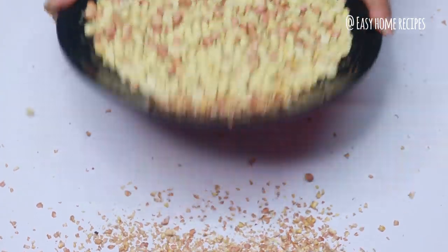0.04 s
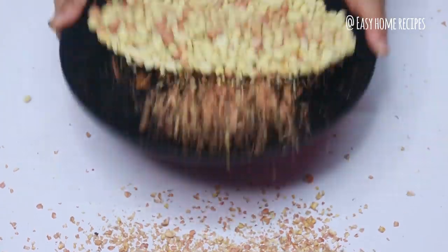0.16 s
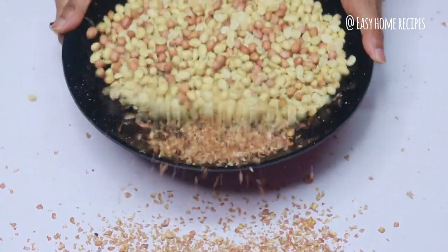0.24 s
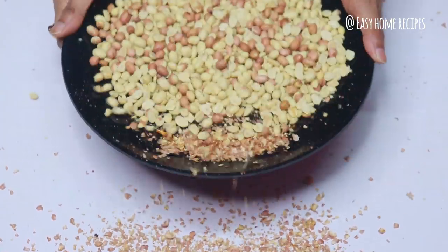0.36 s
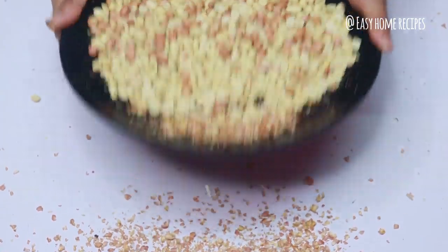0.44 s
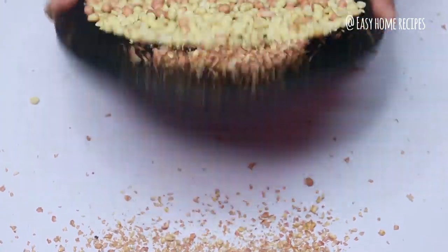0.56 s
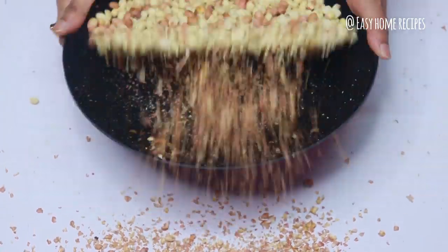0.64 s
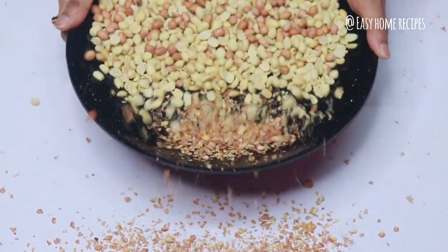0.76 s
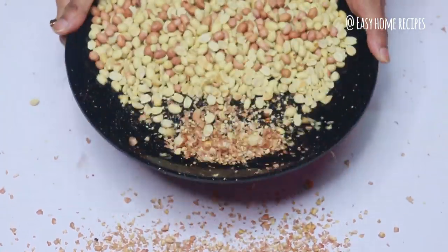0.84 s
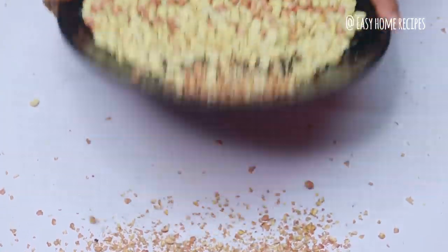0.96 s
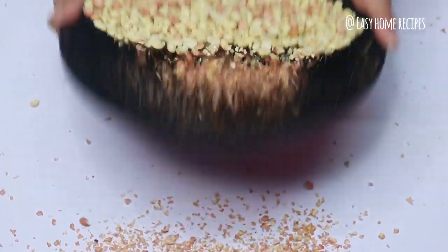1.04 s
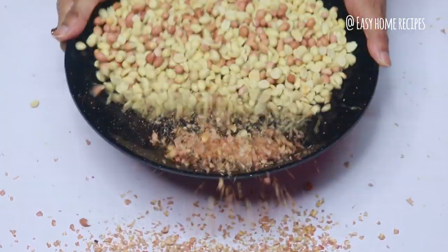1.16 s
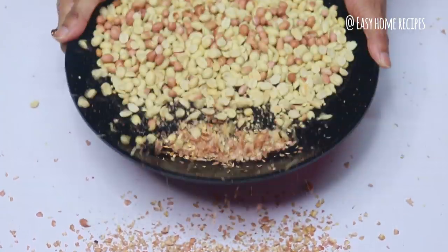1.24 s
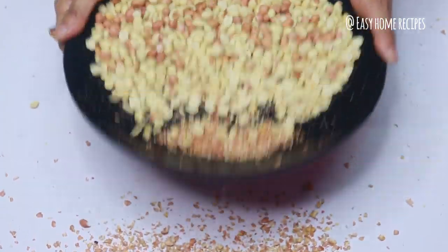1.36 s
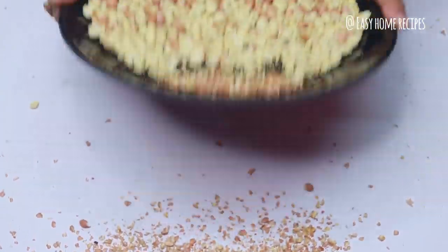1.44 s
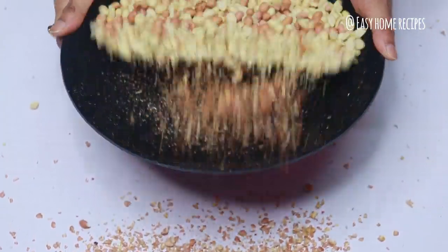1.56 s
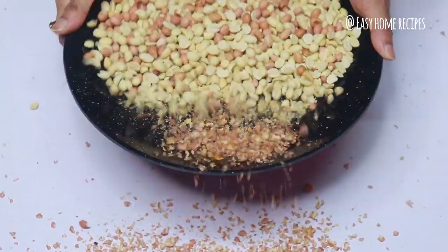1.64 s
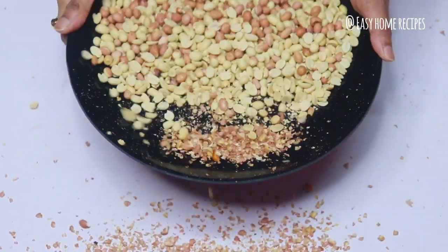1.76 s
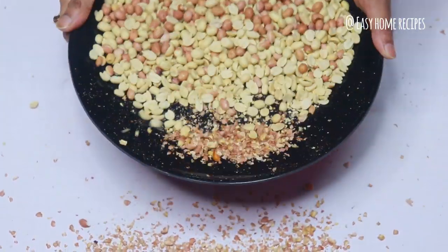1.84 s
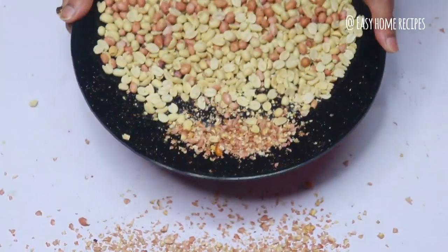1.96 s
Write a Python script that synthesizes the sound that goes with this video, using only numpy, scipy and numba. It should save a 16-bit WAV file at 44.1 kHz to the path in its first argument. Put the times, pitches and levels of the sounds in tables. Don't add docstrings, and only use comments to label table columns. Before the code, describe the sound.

Roasted peanuts rattle on a thin plate, close up in a quiet kitchen. The tail of one toss fades at the start, then dense, hard clattering bursts land at about 0.2, 0.65, 1.1 and 1.6 seconds, the first loudest and slightly distorted. Each mixes a dull thud, short plate ring, crisp clacks and skin ticks, dying quickly into stray clicks, brief room ring and faint low table rumble.

```python
import sys
import numpy as np
from scipy import signal
from scipy.fft import rfft, irfft
from scipy.io import wavfile
from scipy.ndimage import uniform_filter1d
from numba import njit

SR = 44100
rng = np.random.default_rng(int(sys.argv[2]) if len(sys.argv) > 2 else 0)


def ratio_of_db(decibels):
    return 10 ** (np.asarray(decibels, float) / 20)


def unload_wav(signal):
    wavfile.write(
        sys.argv[1],
        SR,
        np.round(np.clip(np.atleast_2d(signal).T, -1, 1) * 32767).astype(np.int16),
    )


N = 88200
LEAD_S = 0.4
BIGGEST = 0.01

# low and high edge in Hz, delay of the
# fall's end in s, settling factor, ring in cycles, size scatter in dB, level in dB.
CONTACTS = [(375.4, 1698, -0.016, 1.04, 6.85, 3, 5), (1301.6, 4800, 0.0066, 0.91, 8.5, -1, -2.5),
            (4570, 10000, 0.0032, 1.16, 18, 2.5, -1), (10000, 15500, 0.0099, 1.56, 2.8, 11, 4)]


def band(x, lo_hz, hi_hz):
    return signal.sosfilt(
        signal.butter(2, [lo_hz, min(hi_hz, 0.45 * SR)], "band", fs=SR, output="sos"), x)


def unit(x):
    return x / np.sqrt(np.mean(x ** 2))


def colour_db(spectrum, hz):
    table_hz, table_db = np.array(spectrum).T
    return np.interp(np.log(hz), np.log(table_hz), table_db)


def sizes(rank, scatter_db):
    return unit(ratio_of_db(-scatter_db * np.log(np.maximum(rank, BIGGEST))))


def fall(t, shift, settle, low=0, high=0, ring=0):
    # first landing in s, build-up in s, full fall in s, level in dB, settling in dB per s.
    tosses = [
        (-.26, 0.032, 0.058, -17.5, 93),
        (0.201, 0.046, 0.051, -3.5, 230),
        (0.626, 0.066, 0.058, -6, 209),
        (1.092, 0.063, 0.039, -6.5, 162.5),
        (1.563, 0.054, 0.054, -7, 188),
    ]
    # thud level in dB, thud settling factor,
    # thud lead in s, brightness in dB, low ring in dB.
    thuds = [
        (-0.5, 1.02, .01, 4, -1),
        (-1.5, 1.14, 0.017, -1.5, 0.5),
        (-1, 0.86, 0.0059, 0., 1.5),
        (0.5, 1.2, 0.011, 0.5, 1),
        (-2.5, 0.97, 0.017, 0., 3.5),
    ]
    first_db, rise_bend, middle_lead = -43, 0.54, 0.82
    lead_share = 1 if low else 0 if high else middle_lead
    out = 0
    for (start, rise, hold, db, slope), (thud_db, factor, lead, bright_db, ring_db) in zip(tosses, thuds):
        early = lead * lead_share
        first = start - early
        up = np.clip((t - first) / (rise + early + max(shift, -0.03) / 2), 0, 1) ** rise_bend
        settling_s = np.clip(t - start - rise - hold - shift, 0, None)
        down = slope * settle * factor ** low * settling_s
        level_db = db + low * thud_db + high * bright_db + ring * ring_db
        out = out + (t > first) * ratio_of_db(level_db + first_db * (1 - up) - down)
    return out


@njit
def grains(at, hz, decay, size, phase, n, sr):
    out = np.zeros(n)
    for j in range(len(at)):
        p = np.exp(2j * np.pi * hz[j] / sr - decay[j])
        z = size[j] * np.exp(1j * phase[j])
        for i in range(at[j], min(n, at[j] + int(6 / decay[j]))):
            out[i] += z.imag
            z *= p
    return out


def clacks(n):
    # frequency in Hz, density in dB per Hz.
    clack_colour = [(180, -55), (300, -28.5), (707, -4.5), (834, -9.5), (1720, -4), (2000, -7),
                    (2690, -3.5), (8540, -13.5), (15500, -25.5)]
    top_steeper = 1.85
    place, rank = rng.random((7000, 2)).T
    at = (place * n).astype(np.int64)
    out = 0
    for lo_hz, hi_hz, shift, settle, cycles, scatter_db, db in CONTACTS:
        pitch, turn = rng.random((len(at), 2)).T
        hz = lo_hz * (hi_hz / lo_hz) ** pitch
        decay = hz / SR / cycles
        evenness = np.sqrt(hz * decay * np.log(hi_hz / lo_hz))
        size = sizes(rank, scatter_db) * ratio_of_db(db + colour_db(clack_colour, hz)) * evenness
        rain = fall(place * n / SR - LEAD_S, shift, settle, low=int(lo_hz < 1000), high=int(lo_hz > 3000))
        if lo_hz > 8000:
            rain = rain ** top_steeper
        out = out + grains(at, hz, decay, size * rain, 2 * np.pi * turn, n, 1. * SR)
    return out


def plate(n):
    # mode frequency in Hz, level in dB, t60 in s.
    modes = [(453, -17, 0.068), (510.3, -8, 0.04), (729, -5, 0.1), (792.4, -4.5, 0.045), (1208, -5, 0.03),
             (1357, -2, 0.02), (1682, -13, 0.034), (1788, -0.6, 0.042), (2693, -0.5, 0.038),
             (2908, -2.5, 0.03), (3565, -3.5, 0.051), (6102, -5.5, 0.017), (7195, -1.5, 0.014),
             (8314, -1.5, 0.016)]
    scatter_db = 3
    high_mode_settle = 1.57
    place, rank = rng.random((5000, 2)).T
    at = (place * n).astype(np.int64)
    big = sizes(rank, scatter_db)
    tops_hz = [contact[1] for contact in CONTACTS]
    out = 0
    for hz, db, t60 in modes:
        k = int(np.clip(np.searchsorted(tops_hz, hz), 0, len(CONTACTS) - 1))
        shift, settle = CONTACTS[k][2:4]
        high = int(k > 1)
        rain = fall(at / SR - LEAD_S, shift, settle * high_mode_settle ** high,
                    low=int(k == 0), high=high, ring=int(hz < 900))
        hits = np.zeros(n)
        np.add.at(hits, at, big * rng.uniform(-1.02, 1, len(at)) * rain)
        decay = np.log(1000) / (max(t60, 0.01) * SR)
        r, w = np.exp(-decay), 2 * np.pi * hz / SR
        ringing = signal.lfilter([1], [1, -2 * r * np.cos(w), r * r], hits)
        out = out + ratio_of_db(db) * np.sqrt(decay) * np.sin(w) * ringing
    return out


def tick(t60):
    t = np.arange(int(t60 * SR)) / SR
    return rng.standard_normal(len(t)) * ratio_of_db(-60 * t / t60)


def bounces(n):
    level_db, scatter_db, settle, t60, centre_hz = -2, 1, 0.67, 0.012, 3240
    place, rank = rng.random((330, 2)).T
    strength = sizes(np.maximum(rank, 8 * BIGGEST), scatter_db) * fall(place * n / SR - LEAD_S, 0., settle)
    hits = np.zeros((4, n))
    np.add.at(hits, (np.arange(len(place)) % 4, (place * n).astype(np.int64)), strength)
    out = sum(signal.fftconvolve(h, tick(t60))[:n] for h in hits)
    out = band(out, centre_hz / 4, centre_hz * 3)
    return ratio_of_db(level_db) * band(out, centre_hz / 8, centre_hz * 3)


def strays(n):
    # time in s, peak in dB, low and high edge in Hz.
    lone_nuts = [(0.012, -40, 2470, 9000), (.0303, -28, 6140, 15500), (.0972, -37, 800, 11000),
                 (0.1494, -43, 800, 11900), (.2089, -15.5, 1550, 10000), (0.6307, -23, 900, 9900),
                 (.6386, -25, 900, 9000), (0.66, -25, 910, 10000), (.6734, -25, 900, 12960),
                 (0.688, -1, 900, 11000), (0.884, -37, 6050, 15500), (1.0934, -49, 890, 10000),
                 (1.1159, -20, 893, 10000), (1.1423, -16, 895, 11000), (1.3218, -28.5, 5000, 15000),
                 (1.376, -22.5, 600, 9500), (1.397, -25, 1500, 9000), (1.557, -33, 500, 2500),
                 (.1945, -30, 400, 2000), (1.389, -34, 7100, 15400), (1.422, -26, 1000, 11700),
                 (1.4345, -56, 11000, 15500), (1.4701, -38, 10000, 15700), (1.523, -48, 11000, 15630),
                 (1.5748, -25, 906, 10000), (1.5924, -11, 900, 11000), (1.745, -33, 9000, 15500),
                 (1.566, -24, 2490, 10000), (1.25, -16, 5000, 11000), (1.85, -32, 6060, 10500)]
    out = np.zeros(n + 2000)
    for s, db, lo_hz, hi_hz in lone_nuts:
        crack = band(band(tick(0.011), lo_hz, hi_hz), lo_hz, hi_hz)
        at = int((s + LEAD_S) * SR)
        out[at:at + len(crack)] += ratio_of_db(db) * crack / np.max(np.abs(crack))
    return out[:n]


def room(x):
    # low and high edge in Hz, t60 in s, level in dB.
    tail_bands = [(106, 1300, 0.48, -9.5), (1270, 7000, 0.48, -12.5), (5000, 9000, 0.37, -12),
                  (9000, 48000, 0.083, -5)]
    t = np.arange(int(SR * LEAD_S * 2)) / SR
    tail = 0
    for lo_hz, hi_hz, t60, db in tail_bands:
        part = rng.standard_normal(len(t)) * ratio_of_db(-60 * t / t60) * np.clip(t / 0.0027, 0, 1)
        tail = tail + ratio_of_db(db) * band(part / np.sqrt(np.sum(part ** 2)), lo_hz, hi_hz)
    return x + signal.fftconvolve(x, tail)[:len(x)]


def table(t):
    # time in s, level in dB, pitch in Hz.
    rumble = [(0., -47, 57.3), (.15, -66, 49.8), (.26, -40.5, 50.1), (0.344, -60, 63.4), (.375, -38, 62),
              (.42, -40, 46.4), (.48, -43.5, 46), (.64, -58, 48), (.73, -53.5, 56.5), (1.0, -56, 56.2),
              (1.24, -55, 60.8), (1.55, -53.5, 59.4), (1.68, -63, 60.8), (1.73, -45, 59.9),
              (1.82, -33, 61.5), (1.865, -45, 57), (1.94, -32, 56.2), (2., -38, 54.7)]
    # start in s, level in dB, pitch in Hz, length in s.
    knocks = [
        (0.61, -56, 270, 0.06),
        (1.81, -40.5, 264.5, 0.074),
        (1.87, -46, 165, 0.058),
        (1.96, -44, 200, 0.041),
        (.365, -44, 260, 0.032),
        (0.6, -57, 150, 0.12),
        (0.49, -48, 430, 0.15),
    ]
    noise_db, steady_db = -10.5, -59
    s, db, hz = np.array(rumble).T
    hum = np.sqrt(2) * np.sin(2 * np.pi * np.cumsum(np.interp(t, s, hz)) / SR)
    noise = unit(band(rng.standard_normal(N), 27.8, 82))
    swell = ratio_of_db(uniform_filter1d(np.interp(t, s, db), size=900))
    out = (hum + ratio_of_db(noise_db) * noise) * swell
    out = out + ratio_of_db(steady_db) * noise[::-1]
    for s, db, hz, length in knocks:
        knock = unit(band(rng.standard_normal(N), hz * 0.9, hz * 1.1))
        out = out + ratio_of_db(db) * knock * np.sin(np.pi * np.clip((t - s) / length, 0, 1)) ** 2
    return out


def floor():
    # frequency in Hz, density in dB per Hz.
    air_colour = [(53, -27), (90, -3), (148, -2), (561, -7.5), (1450, -8), (3210, -15), (3500, -13),
                  (4430, -24), (15500, -26)]
    hz = np.maximum(np.fft.rfftfreq(N, 1 / SR), 1)
    air = irfft(rfft(rng.standard_normal(N)) * ratio_of_db(colour_db(air_colour, hz)), N)
    return ratio_of_db(-50) * unit(air)


def scene():
    clack_db, plate_db = -3, -5.5
    skin_top_hz, plate_low_hz = 11000, 376
    lead = int(LEAD_S * SR)
    n, t = N + lead, np.arange(N) / SR
    strength = np.sqrt(np.mean(fall(np.arange(n) / SR - LEAD_S, 0., 1.) ** 2))
    heap = strength * (ratio_of_db(clack_db) * unit(clacks(n)) + ratio_of_db(plate_db) * unit(plate(n))) + bounces(n)
    heap = signal.sosfilt(signal.butter(2, skin_top_hz, "low", fs=SR, output="sos"), heap)
    nuts = signal.sosfilt(signal.butter(6, plate_low_hz, "high", fs=SR, output="sos"), heap + strays(n))
    return (room(nuts)[lead:] + table(t) + floor())[None]


def low_pass(x):
    return signal.sosfilt(signal.butter(12, 15610, fs=SR, output="sos"), x)


def record(dry):
    drive_db, ceiling = -0.5, 0.96
    mix = np.clip(dry * ratio_of_db(drive_db), -ceiling, ceiling)
    return low_pass(mix)


dry = scene()
out = record(dry)
unload_wav(out)
```